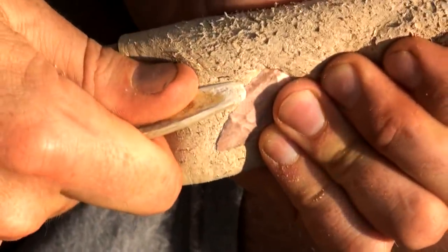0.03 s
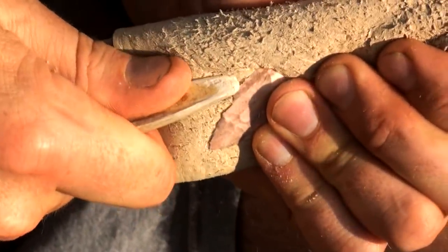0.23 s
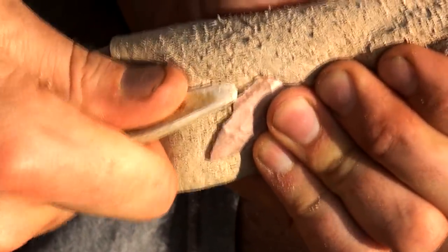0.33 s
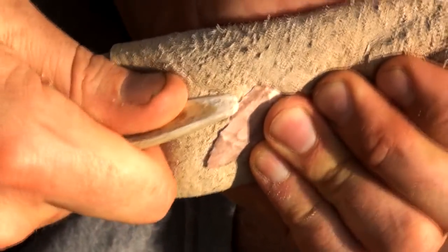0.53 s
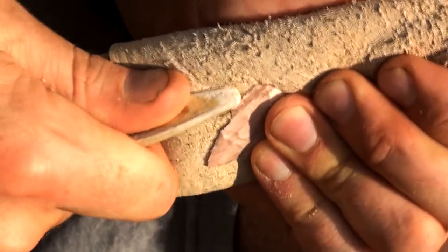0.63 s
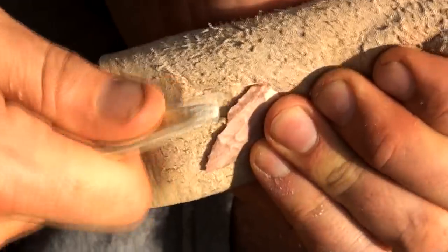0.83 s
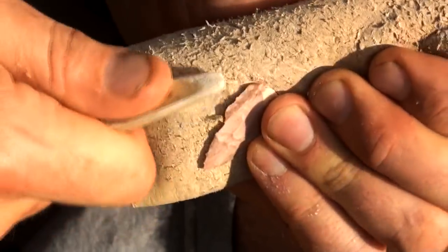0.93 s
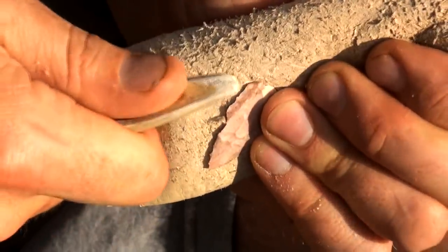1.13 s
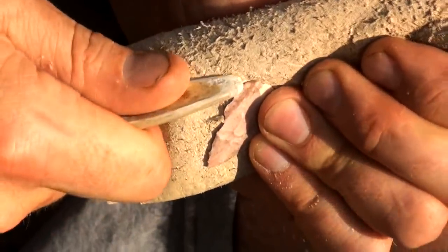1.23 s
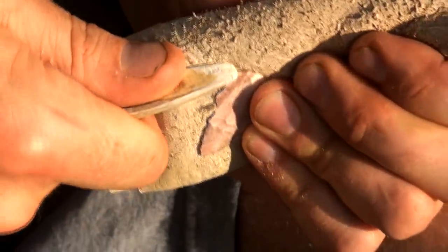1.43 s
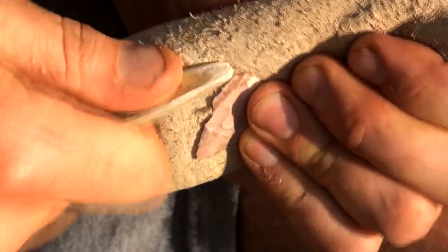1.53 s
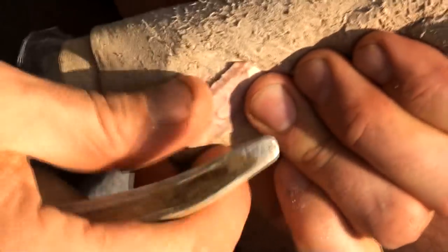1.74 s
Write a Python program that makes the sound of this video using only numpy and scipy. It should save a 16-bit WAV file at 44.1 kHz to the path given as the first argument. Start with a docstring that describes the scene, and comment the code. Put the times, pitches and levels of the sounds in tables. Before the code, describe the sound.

Stone flakes under an antler tip: one sharp snap, a few small crumbling clicks and soft rubs, then a quick run of clicks. The sounds are dry and close to the microphone, with light wind outdoors.

```python
"""Pressure flaking outdoors, close to the microphone. Light wind rumbles and rustles behind throughout;
at the start a gust and a faint tone die away. An antler-like tip bears on a stone held on a leather pad,
and at 0.23 s a flake breaks off in one stuttering snap. The edge crumbles in small clicks, the tip rubs
softly, then near 1.5 s it skips over the edge in a quick run and rubs again. Each click rings tool and
stone and thuds into the pad; the hands damp every ring within milliseconds."""
import sys
import numpy as np
from scipy.fft import rfft, irfft, next_fast_len
from scipy.io import wavfile
from scipy.ndimage import map_coordinates

SR = 44100
rng = np.random.default_rng(int(sys.argv[2]) if len(sys.argv) > 2 else 0)


def store_wav(level_fs):
    """Save 16-bit WAV to argv[1]."""
    pcm = np.round(np.clip(np.atleast_2d(level_fs), -1, 1) * 32767)
    wavfile.write(sys.argv[1], SR, pcm.T.astype(np.int16))


N = 79380
SIZE = 8192  # samples in a click's transform
TIME = np.arange(N) / SR


def amp(db):
    """Decibels to gain."""
    return 10 ** (np.asarray(db) / 20)


def unit(x):
    """Scale to rms 1."""
    return x / np.sqrt(np.mean(x ** 2) + 1e-20)


def gain_at(curve, hz):
    """Gain of a (frequency [Hz], level [dB]) curve, read on a log axis."""
    freqs, db = np.transpose(curve)
    return amp(np.interp(np.log(hz + 1), np.log(freqs), db))


def above(hz, corner_hz):
    """A smooth step from 0 to 1 around a corner."""
    return hz ** 4 / (hz ** 4 + corner_hz ** 4)


def resonance(hz, centre_hz, width_hz):
    """Gain of one resonance, 1 at its centre."""
    return hz * width_hz / np.hypot(centre_hz ** 2 - hz ** 2, hz * width_hz)


def filtered(x, response):
    """Pass x through a frequency response."""
    size = next_fast_len(N + SIZE)
    return irfft(rfft(x, size) * response(np.fft.rfftfreq(size, 1 / SR)), size)[..., :N]


def noise(colour):
    """Noise of rms 1 with a (frequency [Hz], level [dB]) spectrum."""
    return unit(filtered(rng.standard_normal(N), lambda hz: gain_at(colour, hz)))


def narrow_noise(centre_hz, width_hz):
    """Noise of rms 1 in one resonance."""
    return unit(filtered(rng.standard_normal(N), lambda hz: resonance(hz, centre_hz, width_hz) ** 2))


def wobble(knots_per_s):
    """A smooth random curve."""
    return map_coordinates(rng.standard_normal(SIZE), [TIME * knots_per_s], mode="mirror")


def causal(gain):
    """The sharpest causal (minimum-phase) spectrum with this gain."""
    cepstrum = irfft(np.log(np.maximum(gain, 1e-5)))
    cepstrum[1:SIZE // 2] *= 2
    cepstrum[SIZE // 2 + 1:] = 0
    return np.exp(rfft(cepstrum))


def burst(t60_s, rise_s=0.0015):
    """Spectrum of a dying burst of noise with energy 1."""
    t = TIME[:SIZE]
    onset = 1 - np.exp(-(t / rise_s) ** 2)
    tail = rng.standard_normal(SIZE) * np.exp(-np.log(1000) * t / t60_s) * onset
    return rfft(tail / np.linalg.norm(tail))


def add(track, start_s, sound):
    """Mix a sound into a track at a time."""
    part = track[round(start_s * SR):][:len(sound)]
    part += sound[:len(part)]


# low wind at the microphone (frequency [Hz], level [dB])
RUMBLE_SPECTRUM = [(15, -22), (28, -11), (40, -4.5), (55, -2.5), (72, 1), (100, -5.5), (130, -10.5),
                   (175, -16), (230, -21), (400, -47.5)]
# its rise and fall (time [s], level [dB])
RUMBLE_LEVELS = [(0, -0.5), (.17, 1), (.28, -1), (.6, -1), (.95, -0.5), (1.14, 2), (1.27, -1.5), (1.55, 0),
                 (1.68, 3), (1.8, -0.5)]
# rustle in the distance (frequency [Hz], level [dB])
RUSTLE_SPECTRUM = [(120, -38), (190, -7.5), (250, -8.5), (370, -3), (550, -3), (850, 0), (1150, -2),
                   (1900, -13), (3500, -23), (6000, -34.5), (16000, -56)]
# a gust dying away (time [s], level [dB])
GUST_LEVELS = [(0, -44.5), (.2, -47), (.45, -51), (.8, -56), (1.8, -69)]
# its colour (frequency [Hz], level [dB])
GUST_SPECTRUM = [(300, 7), (1000, 2), (1600, 5.5), (2800, -6), (5000, -19), (12000, -42)]

def wind():
    """Light wind behind the work: a low rumble, a wavering distant rustle and a dying gust."""
    rumble = amp(-41 + np.interp(TIME, *np.transpose(RUMBLE_LEVELS))) * noise(RUMBLE_SPECTRUM)
    rustle = amp(-43.5 + 0.32 * wobble(knots_per_s=7.3)) * noise(RUSTLE_SPECTRUM)
    gust = amp(np.interp(TIME, *np.transpose(GUST_LEVELS))) * noise(GUST_SPECTRUM)
    return rumble + rustle + gust


# steady microphone hiss (frequency [Hz], level [dB])
HISS_SPECTRUM = [(2000, -4), (5000, 0), (8000, -1), (16000, -0.5)]

def ambience(fade_db_per_s=99.5):
    """The open-air bed: wind, a faint tone that fades at the start, and the microphone's own hiss."""
    breeze = wind()
    tone = amp(-41.5 - fade_db_per_s * TIME) * narrow_noise(centre_hz=1715, width_hz=120)
    return breeze + tone + amp(-63) * noise(HISS_SPECTRUM)


# near reflections off hands and legs (delay [s], level [dB])
REFLECTIONS = [(.0021, -30), (.0039, -18.5)]

def paths_to_microphone(hz):
    """Direct sound at close range, near reflections, a short scatter and a faint outdoor tail."""
    near = sum(amp(db) * np.exp(-2j * np.pi * hz * delay_s) for delay_s, db in REFLECTIONS)
    return 1 + near + amp(-16) * burst(t60_s=0.019) + amp(-41) * burst(t60_s=0.18)


# resonances of the gripped tool and stone (frequency [Hz], width [Hz], level [dB])
GRIPPED_MODES = [(720, 690, -12.5), (1398, 406, -1.5), (1776, 380, -2), (2380, 410, -6.5), (2740, 270, -10),
                 (3480, 380, -6.5), (4280, 260, -15.5), (4960, 210, -15), (5790, 340, -13),
                 (6950, 620, -21.5), (8180, 270, -28.5), (9950, 1080, -23), (11800, 1100, -30.5),
                 (14300, 950, -38)]
FLANK_STEEPNESS, LIFT_OCTAVES, SMEAR_HZ = 1.406, 0.25, 3050

def click(db, treble_db, top_db, lift_hz, lift_db, thud_db):
    """One sudden release of pressure, with a crunch of grit, rings tool and stone and thuds the pad."""
    hz = np.fft.rfftfreq(SIZE, 1 / SR) + 1
    modes = [amp(level) * resonance(hz, centre, width) ** FLANK_STEEPNESS
             for centre, width, level in GRIPPED_MODES]
    body = np.linalg.norm(modes, axis=0)
    thud = amp(thud_db) * resonance(hz, centre_hz=370, width_hz=360) ** 2
    shelves_db = treble_db * above(hz, corner_hz=3640) + top_db * above(hz, corner_hz=8100)
    peak_db = lift_db * np.exp(-(np.log2(hz / lift_hz) / LIFT_OCTAVES) ** 2)
    ring = causal(np.hypot(body, thud) * amp(shelves_db + peak_db))
    grit_share = 0.56 * above(hz, corner_hz=4250) ** 2  # crumbling grit supplies part of the treble
    crunch = causal(np.sqrt(grit_share)) * burst(t60_s=0.0072, rise_s=0.000086)
    force = causal(np.sqrt(1 - grit_share)) + crunch
    # a slight smear softens each click's onset, treble just ahead of bass
    onset_smear = (1j * hz - SMEAR_HZ) / (1j * hz + SMEAR_HZ)
    return amp(25 + db) * irfft(force * onset_smear * ring * paths_to_microphone(hz))[:SIZE // 2]


# steps of the crack (time [s], relative level [dB])
CRACK_STEPS = [(0.2262, -5.5), (0.2271, -2), (0.2275, -10.5), (0.2283, -7.5), (0.2293, -1.5), (0.2311, -2)]

def flake_snap():
    """The flake breaks off: the crack runs in steps so close that they make one stuttering snap."""
    track = np.zeros(N)
    for start_s, db in CRACK_STEPS:
        step = click(db, treble_db=-6, top_db=6, lift_hz=2120, lift_db=4.5, thud_db=-11.5)
        add(track, start_s, step)
    return track


# clicks of the tip on the edge (time [s], relative level [dB], treble [dB], top treble [dB],
# lifted pitch [Hz], lift [dB], pad thud [dB])
EDGE_CLICKS = [ (0.3434, -23.5, -41, -19, 2630, 22, 11.5), (0.3445, -14.5, -1, -4, 3870, 8, 4),
               (0.3576, -19, 2.5, -9, 3380, 9.5, 5), (.6371, -8.5, -15.5, 7, 2420, 8.5, -2),
               (0.6582, -5, -16.5, 3, 1600, 3, -8.5), (0.6738, -17, -2.5, 11.5, 2520, 14.5, 1.5),
               (.6740, -16, -1, -2.5, 4430, 13.5, -1), (0.697, -22.5, -18, -3, 1500, -3, 1),
               (0.7042, -15.5, -10, -12, 3420, 5.5, -2.5), (.7225, -37, -10, -7, 3500, 5, -5),
               (0.7911, -32, 3.5, -10, 3950, 9, 1), (1.4566, 0.5, -8.5, -3, 5400, 8, -17.5),
               (1.4788, -1.5, 5, -7.5, 7950, 8, -17), (1.4934, -0.5, -8, 1, 10700, 10.5, -19),
               (1.51, -3, 10.5, -11, 3880, -0.5, -35), (1.5309, -20, 0.5, -2, 1380, 6.5, -1),
               (1.5379, -37, 6, 0, 5000, 2, 1), (1.5438, -40, 10, 5, 11000, 5, -10),
               (1.5543, -33, -1, 0, 517, 5.5, 13.5), ]

def edge_clicks():
    """The edge crumbles under the tip; later the tip skips over it in a quick run."""
    track = np.zeros(N)
    for start_s, *settings in EDGE_CLICKS:
        add(track, start_s, click(*settings))
    return track


# rubs on the stone (centre time [s], half-length [s], level [dB], squeak pitch [Hz], pad bump [dB])
TIP_RUBS = [(0.604, 0.0037, -62, 6400, -20), (0.724, 0.0073, -63, 5840, -20),
            (0.802, 0.011, -63.5, 5770, -20), (.90, .03, -62.5, 7250, -20),
            (0.978, 0.046, -63.5, 4450, -16), (1.651, 0.0079, -54.5, 7900, -12),
            (1.66, 0.0092, -49.5, 4000, 3), (1.688, 0.011, -56.5, 3930, -10),
            (1.721, 0.0077, -60.5, 6940, -17)]
# their friction noise (frequency [Hz], level [dB])
FRICTION_SPECTRUM = [(1500, -8), (3500, 3), (6000, -16), (10500, -12), (16000, -21)]

def tip_rubs():
    """The tip rubs the stone, soft and grainy, each time with a faint squeak and a bump of the pad."""
    friction = amp(-1) * noise(FRICTION_SPECTRUM)
    bump = narrow_noise(centre_hz=267, width_hz=220)
    grain = unit(amp(5 * np.tanh(wobble(knots_per_s=500))))
    track = np.zeros(N)
    for centre_s, half_s, db, squeak_hz, bump_db in TIP_RUBS:
        swell = amp(db) * np.exp(-((TIME - centre_s) / half_s) ** 2)
        squeak = narrow_noise(squeak_hz, width_hz=980)
        track += swell * (grain * (friction + squeak) + amp(bump_db) * bump)
    return track


# stereo width of the ambience (frequency [Hz], side relative to mid [dB])
AMBIENCE_WIDTH = [(30, -22), (80, -35.5), (160, -29.5), (400, -31), (1000, -41), (3000, -32), (6000, -8.5),
                  (14000, -7)]

def scene():
    """The work sits close and centred before the microphone; only the ambience has some width."""
    work = flake_snap() + edge_clicks() + tip_rubs()
    mid = work + ambience()
    side = amp(-46) * work + filtered(ambience(), lambda hz: gain_at(AMBIENCE_WIDTH, hz))
    return np.array([mid + side, mid - side])


OVERLOAD_AT, RECOVER_HZ, BAND_LIMIT_HZ = 0.44, 13, 15900

def record(dry):
    """Loud peaks round off and push the microphone off centre; it swings back slowly. The top is cut."""
    excess = np.maximum(np.abs(dry) - OVERLOAD_AT, 0)
    swing = amp(6.5) * filtered(excess, lambda hz: 1j * hz * RECOVER_HZ / (RECOVER_HZ + 1j * hz) ** 2)
    rounded = dry / (1 + dry ** 6) ** (1 / 6)
    return filtered(rounded + swing, lambda hz: 1 / np.sqrt(1 + (hz / BAND_LIMIT_HZ) ** 160))


dry = scene()
out = record(dry)
store_wav(out)
```